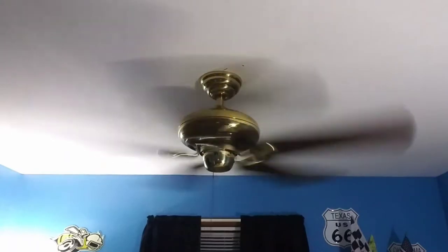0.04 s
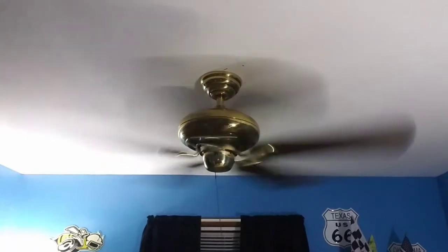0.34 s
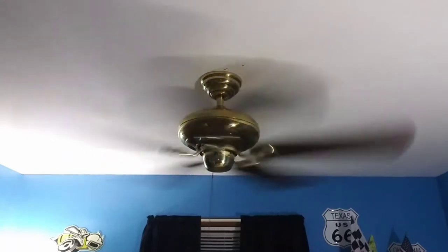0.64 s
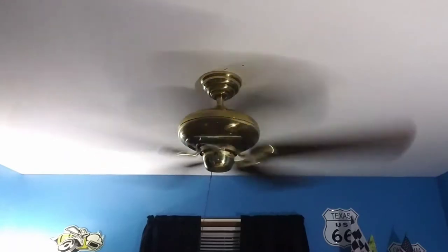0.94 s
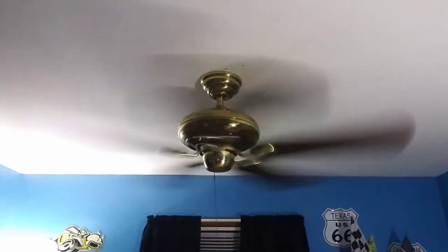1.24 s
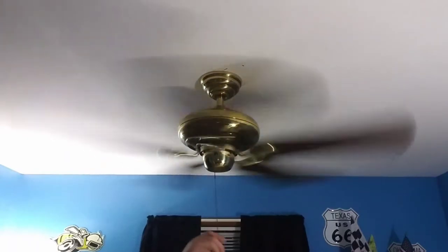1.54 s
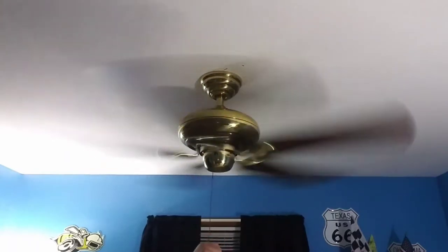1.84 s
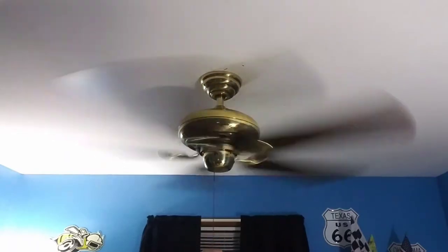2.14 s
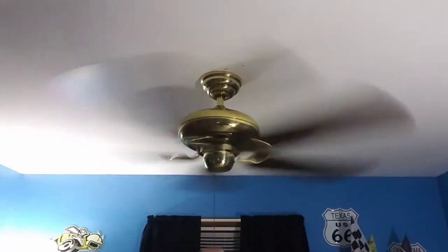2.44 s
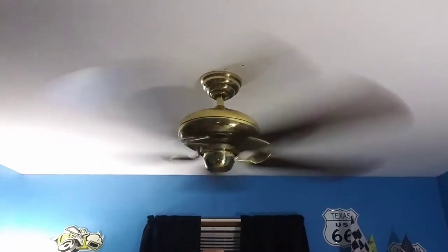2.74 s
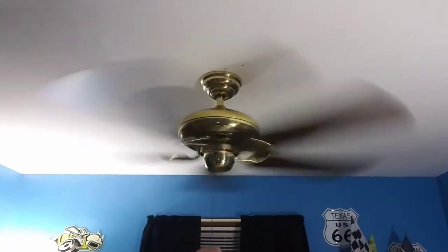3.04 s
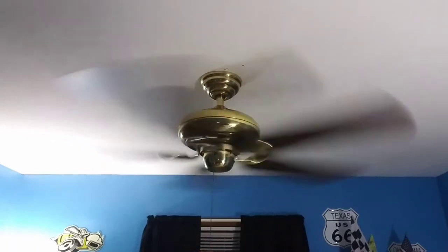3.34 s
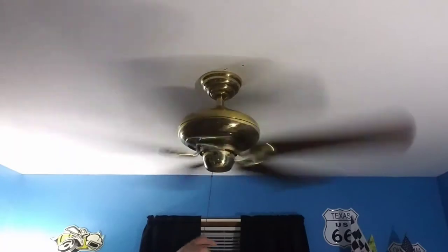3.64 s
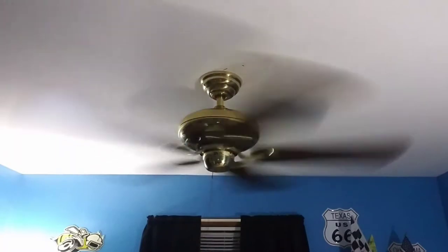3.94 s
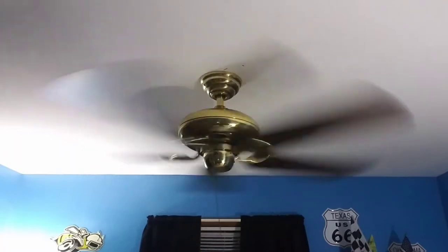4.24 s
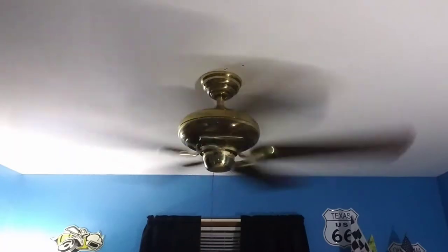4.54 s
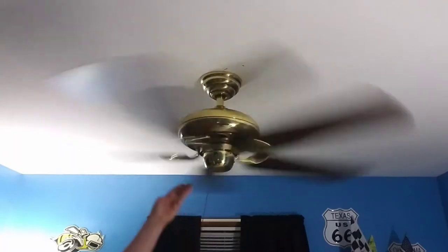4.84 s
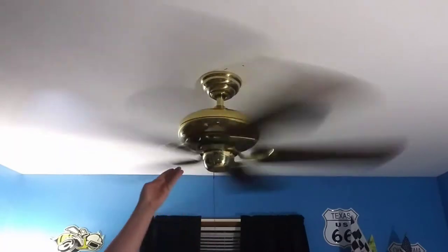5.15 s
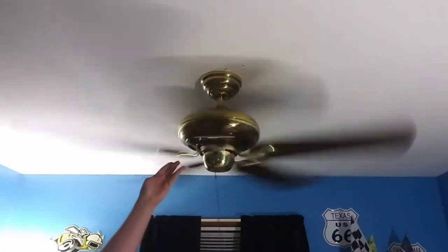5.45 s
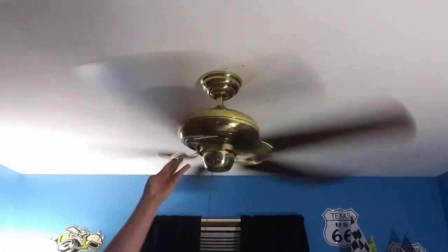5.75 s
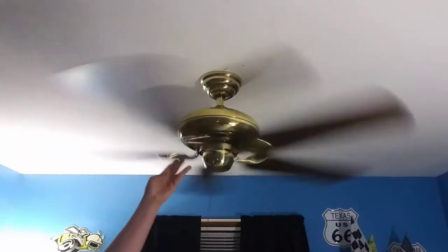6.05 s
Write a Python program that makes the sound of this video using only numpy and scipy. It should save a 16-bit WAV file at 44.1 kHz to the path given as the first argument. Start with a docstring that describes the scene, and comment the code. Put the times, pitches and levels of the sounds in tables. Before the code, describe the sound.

Low hum and soft whir of a ceiling fan, with cloth rustling, quick runs of sharp pull chain clicks and light taps on the blades.

```python
"""A five-blade ceiling fan hums and stirs the air in a small bedroom, its bearing chirping faintly.
Cloth rustles and things knock softly. A hand works the pull chain three times: beads tick through
the guide and the switch snaps in its brass cup. The fan loses a little speed, and at the end
fingertips reach up and patter against the passing blade arms."""
import sys
import numpy as np
from scipy import signal
from scipy.fft import rfft, irfft, next_fast_len
from scipy.io import wavfile
from scipy.ndimage import uniform_filter1d, minimum_filter1d

SR = 44100
rng = np.random.default_rng(int(sys.argv[2]) if len(sys.argv) > 2 else 0)


def to_wav(s):
    """Save 16-bit WAV."""
    ch = np.atleast_2d(s).T  # columns
    pcm = np.round(np.clip(ch, -1, 1) * 32767)  # PCM
    wavfile.write(sys.argv[1], SR, pcm.astype(np.int16))


N = 277389
TIME = np.arange(N) / SR

# The switch snaps over and springs back. Each row: time in seconds, then ping, snap, cup knock and
# chain tension in dB, then when the chain starts to run in seconds (a rebound has no run).
SWITCH_CLICKS = [(2.1288, -23, -36, -27, 3, 1.999), (2.356, -24, -36, -35.5, -1.5, 2.305),
                 (2.3727, -19.5, -28, -25, -5.5, 2.3725), (2.7059, -20, -35.5, -28, 2.5, 2.611),
                 (2.964, -14, -26, -27.5, -1.5, 2.883), (3.241, -5.5, -21.5, -31.5, -0.5, 3.199),
                 (3.2599, -20, -28, -30, 1.5, 3.2598), (3.4276, -11, -27, -26.5, -2.5, 3.352)]
# How the motor housing rings. Each row: pitch in Hz, width in Hz (narrow rings longer), level in dB.
HOUSING_RINGS = [(130, 70, -1), (320, 85, -5), (881, 47, 6.5), (1032, 26, 7.5), (1314, 60, 2)]
# The tone of a sharp snap, a bright swish and a dull rub. Each row: frequency in Hz, level in dB.
SNAP_TONE = [(3000, -20), (5000, -15), (6600, 5.5), (9000, 9.5), (10500, 6), (12500, 0.5), (15300, -0.5)]
SWISH_TONE = [(3000, -17), (6500, -6), (8400, 3), (9800, -7), (12000, -14), (15000, -22)]
RUB_TONE = [(200, -1.5), (500, 2), (950, -2.5), (1500, -8.5), (2800, -11), (5000, -21), (9000, -34)]
BEAD_GAP_S = .034   # rough time between bead ticks
TOUCH_S = 5.553   # from here on the fingertips meet every blade arm


def fan(air_db=1.0, chirp_db=-14.5, chirp_depth_db=2.5, uneven_db=2.0, hiss_db=-61.5):
    """The motor hums, the air rushes and the bearing chirps faintly as each blade goes by."""
    # The motor's steady tones. Each row: pitch in Hz, level in dB.
    motor_tones = [(58.8, -53.5), (120, -60.5), (240, -72)]
    # How strongly the blades stir the air. Each row: time in seconds, level in dB.
    airflow = [(0.0, -52.5), (0.95, -49), (1.35, -52), (2.22, -50), (5.38, -59), (5.75, -55.5),
               (6.29, -57.5)]
    # The tone of the moving air and of a faint hiss. Each row: frequency in Hz, level in dB.
    air_tone = [(25, -15), (55, 1), (75, 2.5), (95, -7), (122, 3), (150, -1), (230, -0.5), (288, 4.5),
                (350, -3), (470, -4.5), (570, -14), (780, -9), (1150, -17), (3000, -32)]
    hiss_tone = [(1290, -29), (2200, -3.5), (2410, -10.5), (2810, -1.5), (3590, -13), (4260, -8),
                 (4660, -9), (5150, -4), (6410, -14), (8540, -1), (9570, -12), (15500, -21)]
    # The motor casing, rubbed by the bearing. Each row: pitch in Hz, width in Hz, level in dB.
    casing_rings = [(1453, 70, 1.5), (1904, 37, 7.5), (2090, 150, -6), (2930, 240, -9.5)]
    passes = blade_passes()
    flow_db = in_time(airflow)
    hum = sum(np.sqrt(2) * from_db(db) * np.sin(2 * np.pi * (hz * TIME + rng.random()))
              for hz, db in motor_tones)
    air = room_noise(air_tone) * from_db(flow_db + air_db)
    pulse_db = -chirp_depth_db * np.cos(2 * np.pi * passes)
    each_pass_db = uneven_db * rng.standard_normal(100)[passes.astype(int)]   # no two rubs are alike
    casing = rms_one(resonate(room_noise(), casing_rings))
    chirps = casing * from_db(flow_db + chirp_db + pulse_db + each_pass_db)
    return hum + air + chirps + from_db(hiss_db) * room_noise(hiss_tone)


def blade_passes():
    """How many blades have gone by, at every sample."""
    # The fan slowing down. Each row: time in seconds, blades passing per second.
    speed = [(0, 12), (2.4, 12), (5.6, 10.45), (6.29, 9.9)]
    return np.cumsum(in_time(speed)) / SR


def pull_chain(ping_db=13.0, snap_db=22.5, cup_db=16.5, housing_db=10.5, contact_s=0.0013):
    """Each click is a burst of tiny hits: the contact snaps, metal pings, cup and housing knock."""
    # The switch's small metal parts and its brass cup. Each row: pitch in Hz, width in Hz, level in dB.
    ping_rings = [(7790, 500, -1), (8380, 430, 4.5), (8890, 610, -2)]
    cup_rings = [(1747, 430, -5.5), (2233, 260, 3.5), (2495, 350, 1.5), (3093, 220, 1), (4070, 330, -4.5),
                 (4430, 186, -1.5), (5520, 550, -11)]
    t = TIME[:SR // 20]
    contact = np.exp(-t / contact_s)
    grit = room_noise(SNAP_TONE)[0]
    bright, body = np.zeros((2, N))
    clicks = [row[:5] for row in SWITCH_CLICKS] + bead_ticks()
    for k, (s, ping, snap, cup, tension) in enumerate(clicks):
        hits = rng.standard_normal(len(t)) * contact
        hits[0] += 7.0   # the first hit is the hardest
        metal = resonate(hits, vary(ping_rings, scatter_db=2.0))
        metal = resonate(metal, [(8520, 2500, 0)])
        hard_db = 0.095 * (ping + 22)   # hard blows put more of their energy into the ping
        add(bright, s, from_db(ping + ping_db + hard_db) * energy_one(metal))
        crack = grit[k * len(t):(k + 1) * len(t)] * contact
        add(bright, s, from_db(snap + snap_db) * energy_one(crack))
        for rings, db in ((cup_rings, cup + cup_db), (HOUSING_RINGS, cup + tension + housing_db)):
            knock = resonate(hits, vary(rings, scatter_db=2.0))
            add(body, s, from_db(db) * energy_one(knock))
    return (bedroom(bright, wet_db=3.5, left_db=-8.0, early_db=-3.0, wet_left_db=-1.5)
            + bedroom(body, wet_db=4.5, left_db=0.0, early_db=-2.5, wet_left_db=0.0))


def bead_ticks(bead_db=-33, rise_db=2.0, speedup=1.2, muting=0.93, uneven_db=1.5):
    """Beads tick through the guide, ever faster and harder; a tight chain sounds duller."""
    ticks = []
    for s, _, _, _, tension, start in SWITCH_CLICKS:
        run_s = s - start
        count = int(np.ceil(run_s / BEAD_GAP_S)) if run_s > BEAD_GAP_S else 0
        for k in range(count):
            to_go = 1 - k / count
            ping = bead_db - rise_db * to_go - muting * tension + uneven_db * rng.normal()
            snap = ping - 15.0 - tension
            cup = ping - 10.5 + tension / 2
            shake = tension + 5   # beads shake the housing more than the switch does
            ticks.append((s - run_s * to_go ** speedup, ping, snap, cup, shake))
    return ticks


def chain_scrape(scrape_db=-62.5, per_tension=1.2):
    """While it runs, a tight chain drags on its guide and sets the housing singing faintly."""
    drag = np.zeros(N)
    for s, _, _, _, tension, start in SWITCH_CLICKS:
        if s - start > BEAD_GAP_S:
            progress = np.interp(TIME, [start, s], [0, 1], right=0)
            drag += from_db(scrape_db + per_tension * tension) * np.sqrt(progress)
    singing = rms_one(resonate(rng.standard_normal(N), HOUSING_RINGS[2:]))
    scrape = singing * drag * crinkle(depth_db=4.0, rate_hz=260)
    return bedroom(scrape, wet_db=0.0, left_db=1.0, wet_left_db=-2.0)


def fingers(near_miss_s=6.1, fade_db_per_s=12.5, skin_s=0.019, nail_s=0.0043):
    """Nail and skin brush each passing arm, ever more lightly, and the fingertip thuds against it."""
    passes = blade_passes()
    touched_arms = np.arange(np.interp(TOUCH_S, TIME, passes), passes[-1], 1)
    touches = np.interp(touched_arms, passes, TIME)
    times = np.append(near_miss_s, touches)   # one extra brush barely catches the fingers
    levels_db = np.append(-46, -38.5 - fade_db_per_s * (touches - TOUCH_S))
    skin = from_db(-13.5) * room_noise(SWISH_TONE) + from_db(-19.0) * room_noise(RUB_TONE)
    skin *= swells(times, levels_db, np.full(len(times), skin_s))
    nail = room_noise(SNAP_TONE) * swells(times, levels_db - 13.5, np.full(len(times), nail_s))
    thuds = blade_thuds(touches)
    brush = (skin + nail) * crinkle(depth_db=4.0, rate_hz=400)
    return brush + bedroom(thuds, wet_db=-1.0, left_db=0.5, wet_left_db=1.0)


def blade_thuds(touches, lag_s=0.018, stray_s=0.00496, fade_db_per_s=0.5, uneven_db=0.5, push_s=0.0006):
    """The soft fingertip lands just after the nail and sets the blade thudding."""
    # How a blade rings. Each row: pitch in Hz, width in Hz, level in dB.
    blade_rings = [(53, 14.4, -1), (112, 36, -2), (143, 34, -4), (269, 86, -22), (626, 31, -15),
                   (800, 100, -17)]
    landings = [(TOUCH_S + 0.038, -33.5)]   # the first arm catches the finger full on
    for s in touches[1:]:
        landing_s = s + lag_s + stray_s * rng.normal()
        db = -39.5 - fade_db_per_s * (s - TOUCH_S) + uneven_db * rng.normal()
        landings.append((landing_s, db))
    push = np.exp(-TIME[:SR // 5] / push_s)
    thuds = np.zeros(N)
    for s, db in landings:
        thud = resonate(push, vary(blade_rings, scatter_db=2.5))
        add(thuds, s, from_db(db) * thud / np.abs(thud).max())
    return thuds


def rustles(swish_db=-11.5, bump_db=-1.5, fidget_rub_db=-10.0, ease_s=0.03):
    """Sliding cloth makes a bright swish over a duller rub and a soft bump."""
    # Strokes of cloth and hand. Each row: start in seconds, swish in dB, rub in dB, rise in seconds.
    strokes = [(0.05, -47, -47.5, 0.013), (0.325, -31.5, -60, 0.027), (0.3574, -32.5, -41.5, 0.016),
               (0.487, -34.5, -41, 0.019), (0.604, -34, -49, 0.007), (0.715, -37.5, -42, 0.012),
               (1.044, -33, -36, 0.012), (4.1094, -44.5, -57.5, 0.022), (4.309, -43, -69, 0.017),
               (4.923, -29.5, -45.5, 0.011)]
    # Faint shifting of cloth. Each row: start in seconds, end in seconds, level in dB.
    fidgets = [(0, 0.094, -40.5), (0.415, .52, -43.5), (.86, 0.968, -42.5), (4.5, 4.616, -51)]
    # The tone of the soft bump. Each row: frequency in Hz, level in dB.
    bump_tone = [(40, -30), (100, 22.5), (180, 11.5), (280, 16.5), (450, -7), (900, -41)]
    starts, swish, rub, rises = np.transpose(strokes)
    grains = crinkle(depth_db=2.0, rate_hz=450)
    fidget = sum(from_db(db) * np.clip(np.minimum(TIME - start, end - TIME) / ease_s + .5, 0, 1)
                 for start, end, db in fidgets)
    fidget *= crinkle(depth_db=2.5, rate_hz=40)
    sliding = np.hypot(swells(starts, swish, rises), fidget)
    pressing = np.hypot(swells(starts, rub, rises), from_db(fidget_rub_db) * fidget)
    return (room_noise(SWISH_TONE) * from_db(swish_db) * sliding * grains
            + room_noise(RUB_TONE) * pressing * grains
            + room_noise(bump_tone) * from_db(bump_db) * pressing)


def knocks(knock_db=-1.0, contact_s=0.0049):
    """A brief scuff makes a handled thing ring for a moment."""
    # Small knocks. Each row: start in seconds, level in dB, pitch in Hz, width in Hz.
    small_knocks = [(0.052, -34.5, 1400, 260), (0.656, -39, 3260, 4200), (0.960, -37, 105, 45),
                    (3.469, -34.5, 257, 59.6), (4.126, -43.5, 950, 130), (4.519, -42, 430, 110),
                    (4.985, -41.5, 110, 60)]
    t, out = TIME[:SR // 5], np.zeros(N)
    for s, db, hz, width in small_knocks:
        scuff = rng.standard_normal(len(t)) * np.exp(-t / contact_s)
        ring = resonate(scuff, [(hz, width, 0)])
        add(out, s, from_db(db + knock_db) * ring / np.abs(ring).max())
    return bedroom(out, wet_db=1.0, left_db=-1.0)


def bedroom(x, wet_db, left_db, early_db=-6.0, early_s=0.025, wet_left_db=-3.0):
    """A sound plus its echo (the wet part): quick bounces off ceiling and blades, then a dying tail."""
    # How long the echo lasts. Each row: frequency in Hz, seconds to fade by 60 dB.
    fade_times = [(150, 0.31), (1000, 0.25), (3000, 0.31), (8000, 0.23), (15000, 0.25)]
    t, tail = TIME[:SR // 3], 0
    white = [room_noise(size=len(t)) for _ in range(2)]   # neighbouring bands are unrelated
    edges = np.geomspace(60, 18000, 9)
    for k, (low, high) in enumerate(zip(edges, edges[1:])):
        band = signal.sosfilt(signal.butter(2, [low, high], "band", fs=SR, output="sos"), white[k % 2])
        tail = tail + band * from_db(-60 * t / at_hz(fade_times, np.sqrt(low * high)))
    early_boost = 1 + from_db(early_db) * np.exp(-t / early_s)
    tail = energy_one(tail * (t > .002) * early_boost)
    wet = signal.oaconvolve(x[None], tail, axes=1)[:, :N]
    return pan(x, left_db) + pan(from_db(wet_db) * wet, wet_left_db)


def room_noise(tone=((1, 0), (2, 0)), size=N):
    """Stereo noise with a given tone; left and right are alike only in the bass."""
    # How alike the two sides are. Each row: frequency in Hz, likeness from 0 (unrelated) to 1 (same).
    likeness = [(60, 1), (170, 0.97), (350, 0.9), (700, 0.39), (1500, 0.18), (5000, 0.097), (14000, 0.056)]
    padded = next_fast_len(size, real=True)
    hz = np.arange(padded // 2 + 1) * SR / padded
    alike = at_hz(likeness, hz)
    mid, side = rfft(rng.standard_normal((2, padded)))
    pair = np.sqrt(1 + alike) * mid + np.sqrt(1 - alike) * side * [[1], [-1]]
    return rms_one(irfft(pair * from_db(at_hz(tone, hz)), padded)[:, :size])


def resonate(x, rings):
    """Let a sound ring at several pitches at once; every second ring is flipped in sign."""
    out = 0
    for k, (hz, width, db) in enumerate(rings):
        r = np.exp(-np.pi * width / SR)
        poles = [1, -2 * r * np.cos(2 * np.pi * hz / SR), r * r]
        out = out + (-1) ** k * from_db(db) * (1 - r * r) / 2 * signal.lfilter([1, 0, -1], poles, x)
    return out


def vary(rings, scatter_db):
    """Every blow lands a little differently, so each ring comes out louder or softer."""
    return [(hz, width, db + scatter_db * rng.normal()) for hz, width, db in rings]


def swells(times, levels_db, rises_s):
    """A loudness curve of strokes that grow to their peak in a given time, then fade."""
    power = np.zeros(N)
    for s, db, rise_s in zip(times, levels_db, rises_s):
        age = TIME[:SR // 3] / rise_s
        add(power, s, (from_db(db) * age * np.exp(1 - age)) ** 2)
    return np.sqrt(power)


def crinkle(depth_db, rate_hz):
    """Rubbing surfaces catch and slip, so the loudness comes in quick random grains."""
    times = np.arange(0, N / SR + 1, 1 / rate_hz)
    return rms_one(from_db(depth_db * np.interp(TIME, times, rng.standard_normal(len(times)))))


def from_db(db):
    """Turn decibels into a number to multiply by."""
    return 10 ** (np.asarray(db) / 20)


def rms_one(x):
    """Scale to an average strength (rms) of 1."""
    return x / np.sqrt(np.mean(x ** 2) + 1e-20)


def energy_one(x):
    """Scale to a total energy of 1 in each channel."""
    return x / np.sqrt(np.sum(x ** 2, axis=-1, keepdims=True) + 1e-20)


def in_time(rows):
    """Join (time, value) points into a curve with a value at every sample."""
    return np.interp(TIME, *np.transpose(rows))


def at_hz(points, hz):
    """Read between (frequency, value) points, with octaves evenly spaced."""
    f, value = np.transpose(points)
    return np.interp(np.log(np.maximum(hz, 1)), np.log(f), value)


def add(track, s, sound):
    """Mix a sound into a track, starting at s seconds."""
    i = round(s * SR)
    track[..., i:i + sound.shape[-1]] += sound[..., :N - i]


def pan(x, left_db):
    """Place a sound by making the left side left_db louder than the right."""
    return x * from_db([[left_db / 2], [-left_db / 2]])


def scene():
    """All sources together, the fan slightly to the right."""
    return pan(fan() + rustles() + fingers(), left_db=-1.14) + knocks() + pull_chain() + chain_scrape()


def record(dry, ceiling=.88, release_db_per_s=901.0, cutoff_hz=15600):
    """A quick limiter turns down any peak that is too loud; the highest treble is cut steeply."""
    over_db = np.maximum(20 * np.log10(np.abs(dry).max(axis=0) / ceiling + 1e-9), 0)
    release_db = release_db_per_s * TIME
    held_db = np.maximum.accumulate(over_db + release_db) - release_db
    gain_db = uniform_filter1d(minimum_filter1d(-held_db, size=33), size=33)
    treble_cut = signal.ellip(10, .1, 80, cutoff_hz, fs=SR, output="sos")
    return signal.sosfilt(treble_cut, dry * from_db(gain_db))


dry = scene()
out = record(dry)
to_wav(out)
```